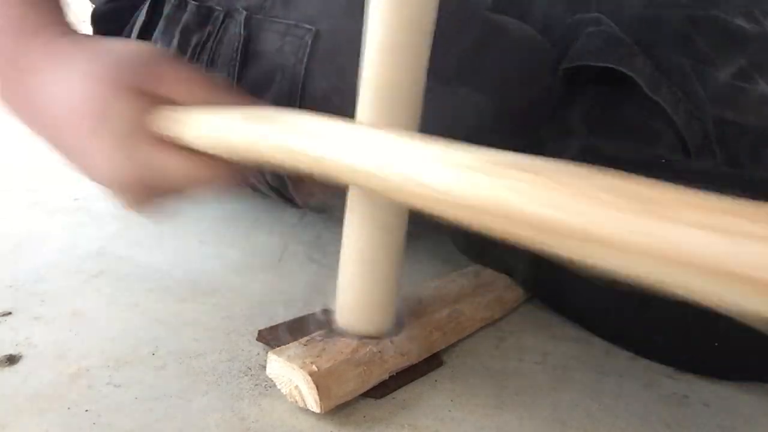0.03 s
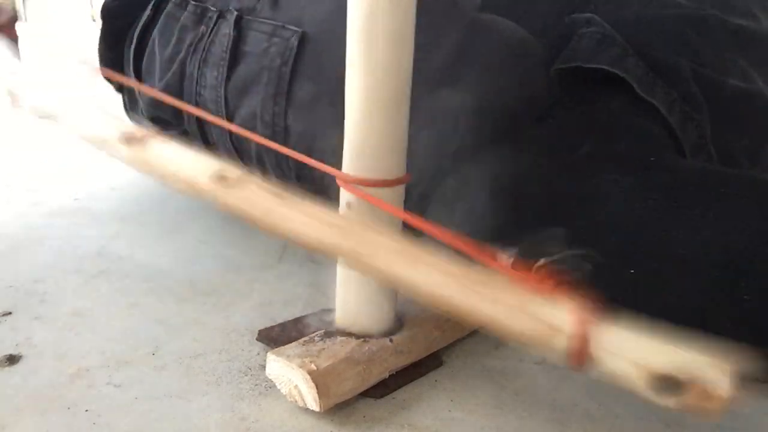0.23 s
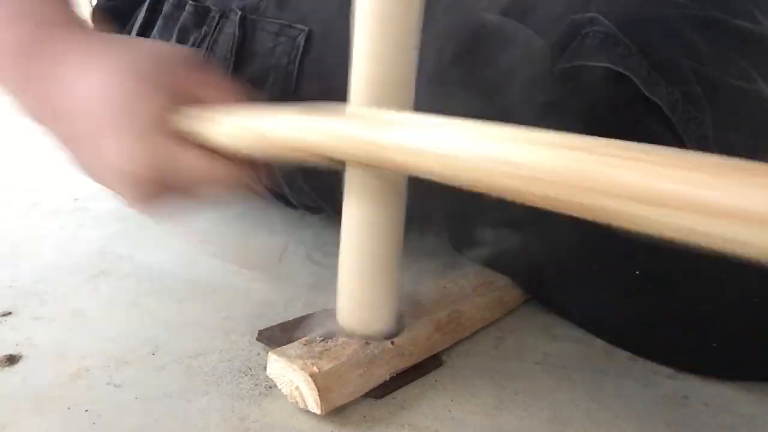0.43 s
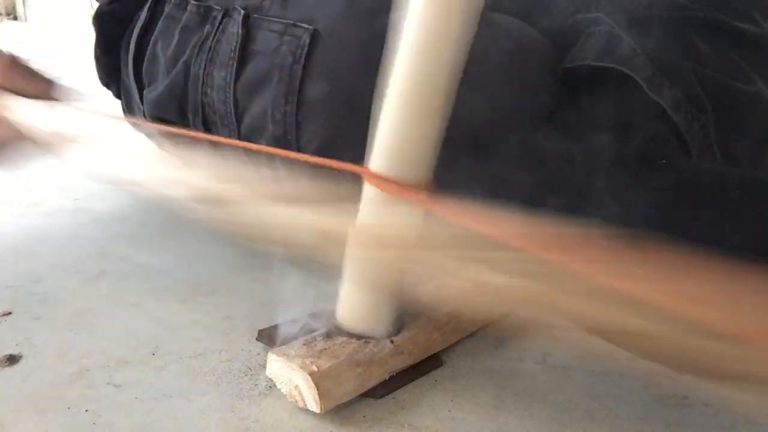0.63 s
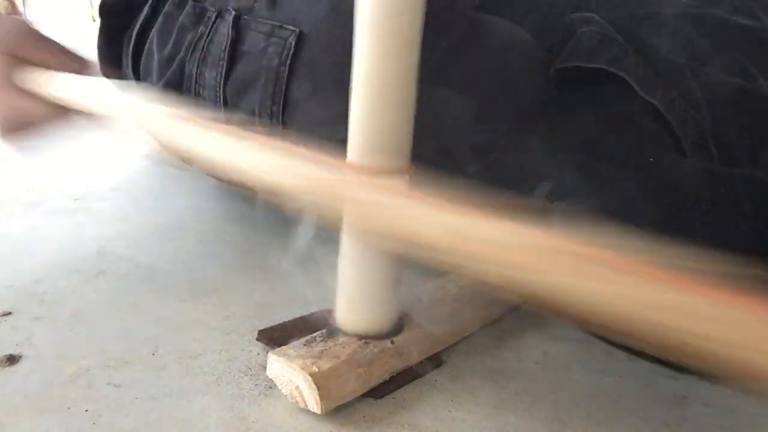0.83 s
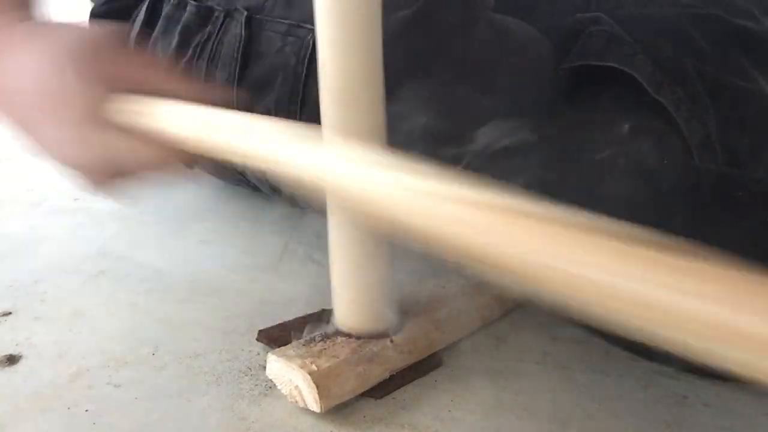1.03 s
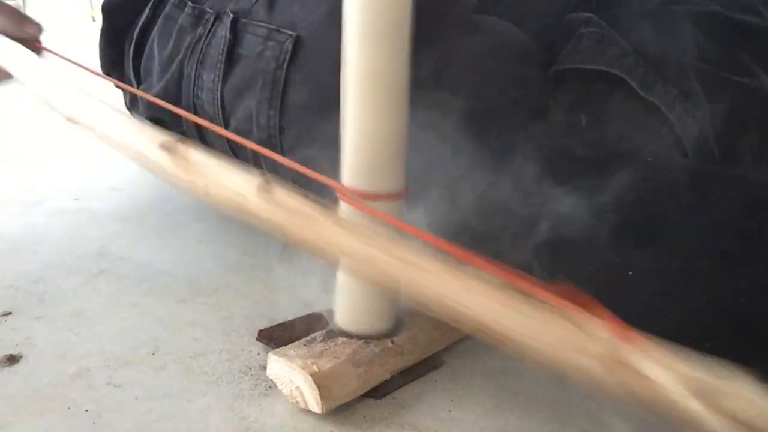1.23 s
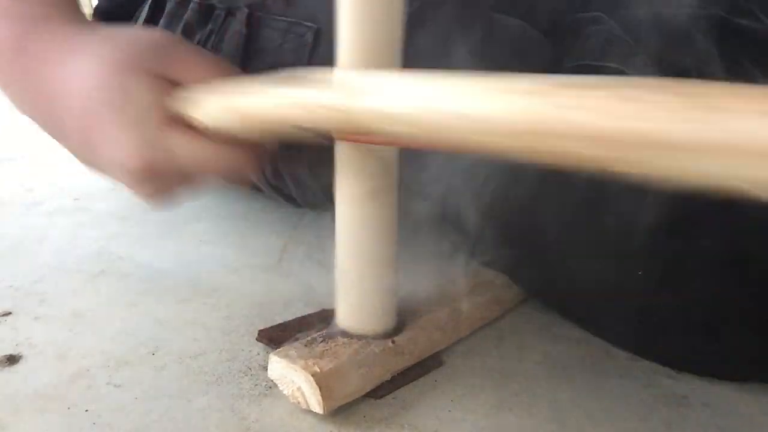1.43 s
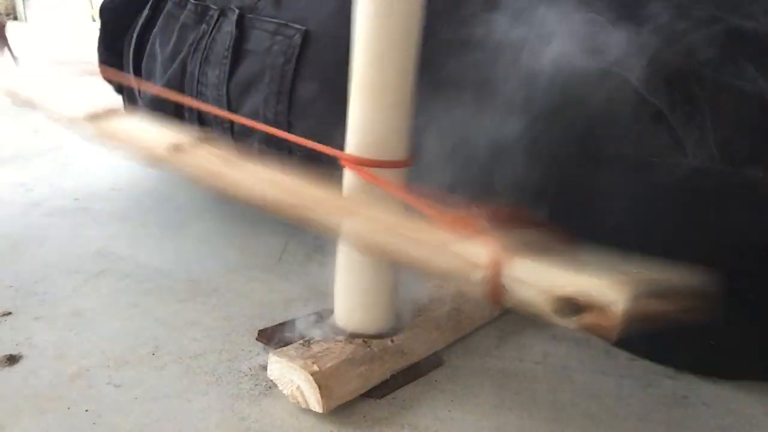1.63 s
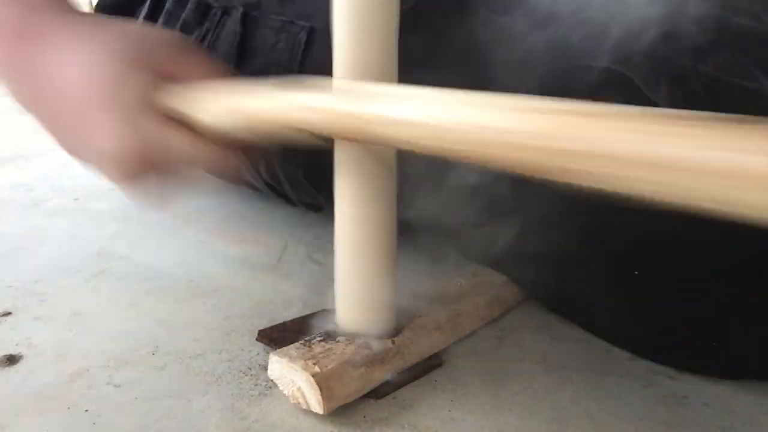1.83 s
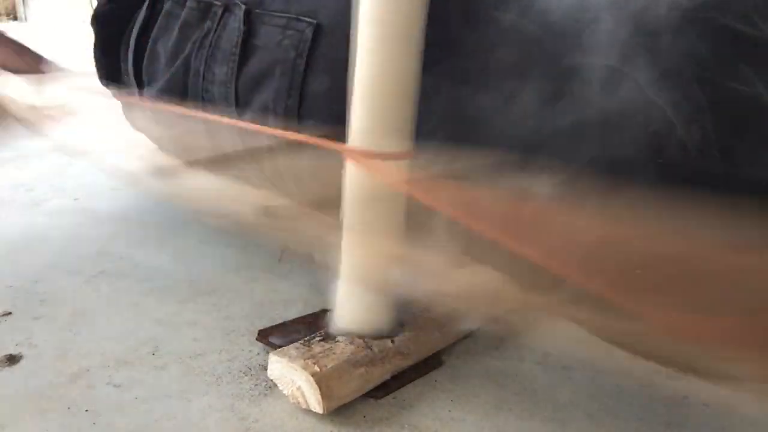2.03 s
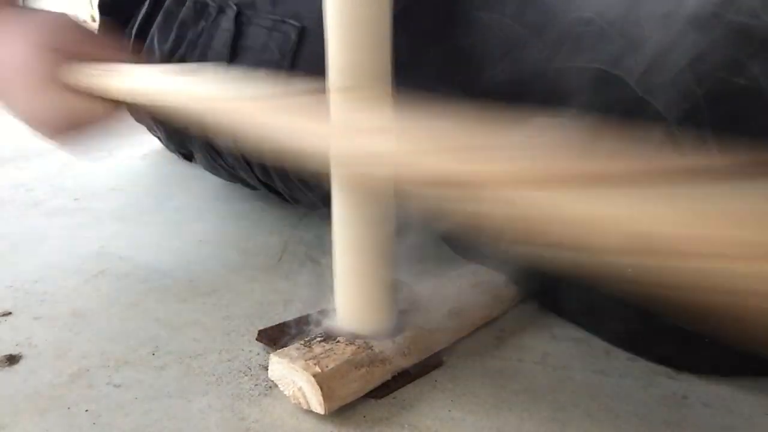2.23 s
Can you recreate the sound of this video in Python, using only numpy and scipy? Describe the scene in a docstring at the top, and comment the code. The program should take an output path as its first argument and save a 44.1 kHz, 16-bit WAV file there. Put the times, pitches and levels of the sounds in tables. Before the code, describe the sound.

Bow drill rasping back and forth in wood, about four strokes a second, with brief sharp squeaks

```python
"""Bow drill up close

One microphone close to the work: a cord spins a wooden spindle to and fro in the socket of a fire board.
Each stroke is filtered noise and grit, rasping through the wood's resonances. At times it breaks into a
low or a high squeak, made of bursts of wavering partials. At the turning points the tip sticks and slips
as gliding tones, creaks as runs of tiny scratches and knocks as damped board modes. Quiet air, steady
noise, lies behind."""
import sys
import numpy as np
from scipy import signal
from scipy.fft import rfft, irfft, next_fast_len
from scipy.io import wavfile
from scipy.ndimage import uniform_filter1d, map_coordinates

SR = 44100
rng = np.random.default_rng(int(sys.argv[2]) if len(sys.argv) > 2 else 0)


def wav_out(sig):
    """Save sig, one row per channel (or a flat mono array), as 16-bit PCM at SR to the path in sys.argv[1]."""
    wavfile.write(sys.argv[1], SR, np.round(np.clip(np.atleast_2d(sig).T, -1, 1) * 32767).astype(np.int16))


def to_linear_factor(level_db):
    """Convert decibel levels (scalar or array-like) to linear amplitude factors."""
    exponent = np.asarray(level_db, float) / 20
    return 10 ** exponent


N = 101429
T = np.arange(N) / SR  # seconds

# Colour of the rasp ahead of the wood. Each row: frequency in Hz, relative level in dB per Hz.
RASP_COLOUR = [(88, -66.5), (150, -8), (1160, -15.5), (1820, -8), (15800, -7.5)]
# Resonances of spindle and board. Each row: centre in Hz, width in Hz, level in dB against the direct path.
WOOD_RESONANCES = [(268, 154, 7), (1320, 300, 20.5), (2580, 393, 14.5), (4114, 990, 9), (7680, 1160, 10.5),
                   (9200, 710, 10), (11400, 1260, 5.5)]
# Bow strokes. Each row: start in seconds, end in seconds, level in dB, time constant of gathering speed
# in seconds, time constant of slowing in seconds.
STROKES = [(-.1, 0.125, -49, 0.0099, 0.043), (0.143, 0.369, -50, 0.028, 0.033),
           (0.394, 0.615, -49.5, 0.03, 0.045), (0.601, 0.842, -46.5, 0.083, 0.021),
           (0.866, 1.105, -50.5, 0.026, 0.014), (1.098, 1.324, -54, 0.031, 0.023),
           (1.324, 1.528, -45, 0.064, 0.016), (1.507, 1.776, -52, 0.018, 0.016),
           (1.769, 2.012, -50.5, 0.044, 0.0028), (2.01, 2.243, -51.5, 0.035, 0.014),
           (2.244, 2.446, -50.5, 0.018, 0.024)]
# Narrow band rasped by singing strokes: centre in Hz, width in Hz, level in dB against the stroke.
SINGING_BAND = (4383, 460, -9)
# Colour of the air. Each row: frequency in Hz, relative level in dB per Hz.
AIR_COLOUR = [(22, -23), (70, -4), (250, -12.5), (700, -14), (3200, -17.5), (15800, -32)]
# Taps on the board. Each row: start in seconds, nominal peak in dB, how freely the board rings
# (a factor on the decay times of BOARD_MODES).
KNOCKS = [(.0042, -27, .2), (.3905, -34, .35), (.624, -33, .8), (1.0848, -35, .4), (1.0995, -39, .7),
          (1.1083, -30, .6), (1.3378, -31, .5), (1.7962, -30, .5), (2.0188, -30, .9), (2.2505, -30, .35)]
# Modes of the tapped board. Each row: frequency in Hz, level in dB, time to fall by 60 dB in seconds.
BOARD_MODES = [(1600, -7, .025), (2000, 0, .03)]
# Soft low bumps of the board. Each row: centre in seconds, level in dB.
BUMPS = [(0.771, -62), (1.267, -61)]
# Low squeak. Each row: centre in seconds, half length in seconds, pitch in Hz, level in dB, octave level in dB.
LOW_SQUEAKS = [(0.208, 0.037, 1262, -51.5, -63), (.245, 0.0041, 1258, -29.5, -70),
               (.257, 0.005, 1201, -22, -31.5), (.272, 0.0099, 1127, -30, -42.5),
               (0.285, 0.0022, 1140, -26.5, -26), (0.295, 0.0086, 1186, -34, -41.5),
               (.331, 0.0041, 1224, -33.5, -44.5), (0.359, 0.04, 1158, -55.5, -65),
               (1.042, 0.0044, 1371, -43, -58.5), (1.289, 0.011, 1315, -54.5, -72),
               (1.46, 0.0058, 1309, -47.5, -70), (1.653, 0.0067, 1115, -37, -53),
               (1.668, 0.0042, 1070, -22, -27), (1.68, 0.0033, 1131, -27, -31),
               (1.687, 0.0038, 1027, -22, -41), (1.699, 0.0049, 1133, -21.5, -30),
               (1.72, 0.0055, 1195, -22.5, -28), (1.73, 0.0038, 1098, -23.5, -29.5),
               (1.737, 0.0037, 1158, -24.5, -32.5), (1.749, 0.0051, 1164, -21.5, -54),
               (1.763, 0.0068, 1245, -41.5, -52), (1.785, 0.0018, 1176, -42.5, -56),
               (1.822, 0.032, 1150, -52.5, -61.5), (2.111, 0.017, 1282, -53, -83),
               (2.138, 0.0063, 1147, -41.5, -57), (2.151, 0.0049, 1260, -33, -54.5),
               (2.169, 0.0047, 1307, -33.5, -48.5)]
# High squeak. Each row: centre in seconds, half length in seconds, pitch in Hz, level in dB.
HIGH_SQUEAKS = [(.035, 0.027, 2560, -53.5), (.06, 0.0022, 2640, -48), (.104, 0.0034, 2520, -53.5),
                (.46, 0.0057, 2540, -31), (.499, 0.0052, 2590, -31.5), (.508, 0.0065, 2634, -31.5),
                (.535, 0.005, 2570, -16.5), (.544, 0.0049, 2631, -23.5), (.57, 0.018, 2560, -42.5),
                (.586, 0.0049, 2494, -30), (.61, 0.0052, 2590, -47), (.632, 0.0094, 2575, -45),
                (.934, 0.0067, 2520, -41.5), (.946, 0.0043, 2580, -43), (1.008, 0.013, 2544, -51),
                (1.41, 0.036, 2477, -57), (2.29, 0.0047, 2550, -49)]
# Brief flares of the upper partials. Each row: centre in seconds, half length in seconds, level in dB.
FLARES = [(.256, 0.006, -55), (.284, .004, -53), (.541, .006, -42.5), (.586, 0.0024, -48),
          (1.741, 0.0087, -55)]
# Stick-slip glides, one list per glide. Each row: time in seconds, slips per second, level in dB.
SLIP_GLIDES = [
    [(.144, 3000, -68), (.15, 4100, -50), (.153, 4500, -60)],
    [(1.509, 6000, -57), (1.522, 4200, -51), (1.527, 3100, -58), (1.539, 2500, -54)],
    [(1.553, 1800, -60), (1.558, 3400, -56), (1.565, 3450, -45), (1.574, 4150, -40), (1.576, 5500, -49),
     (1.583, 6050, -45), (1.59, 6900, -43)],
    [(1.763, 5400, -57), (1.776, 4000, -59)],
    [(1.976, 7700, -55), (1.983, 5300, -59), (1.988, 4400, -47), (2.002, 1700, -56)],
    [(2.022, 2100, -53), (2.037, 4800, -53), (2.044, 6000, -58), (2.053, 6350, -41), (2.059, 8500, -43),
     (2.064, 8700, -58)],
]
# Creaks. Each row: start in seconds, length in seconds, mean slips per second, median slip level in dB.
CREAKS = [(1.084, .01, 1500, -52), (1.329, .01, 2350, -49), (1.543, .013, 1400, -43),
          (1.789, .008, 2000, -45), (1.999, .007, 2300, -46), (2.014, .022, 2300, -50),
          (2.231, .02, 1700, -48)]

# Rasp: the hiss needs more speed than the body (exponents of speed); body corner in Hz
DULL_HZ, BODY_GROWS, HISS_GROWS = 3300, 1.75, 2.02
GRIT_PER_S, GRIT_SPREAD_DB, GRIT_SHARE = 4500, 2.3, .4  # share of power
PATCHY_DB, FLUTTER_DB = 2.8, 1.8
SING_DB = -31  # a stroke sings if a low squeak within it is louder than this
AIR_DB = -66.5
BUMP_HZ, BUMP_S = 304, 0.023
THIRD_DB = -3.5  # third partial of the high squeak against its second
SQUEAK_WAVER = .009  # pitch scatter as a share, before weak moments widen it
WEAK, WEAK_ROUGH_DB = .005, 4  # amplitude around which a squeak turns unsteady, and its added flutter
UPPER_ROUGH_DB = 2.4  # added flutter per overtone, up to the second
SLIP_FALL_DB = -16  # per overtone, before the wood
SLIP_ROUGH_DB, SLIP_WAVER = 4, .025
CREAK_JITTER, SLIP_S = .15, 0.0012  # scatter in mean slip gaps, decay time of one scratch


def unit(x):
    """Brings a signal to rms 1."""
    return x / np.sqrt(np.mean(x ** 2) + 1e-20)


def along(points, hz):
    """Reads (Hz, value) points on a log frequency axis."""
    f, v = np.transpose(points)
    return np.interp(np.log(hz + 1), np.log(f + 1), v, right=-120)


def wobble(per_s):
    """A smooth curve through per_s random values a second."""
    return map_coordinates(rng.standard_normal(N), [T * per_s])


def filtered(x, response):
    """Filters x by a complex response of frequency."""
    m = next_fast_len(N + 8192)
    return irfft(rfft(x, m) * response(np.fft.rfftfreq(m, 1 / SR)), m)[:N]


def resonance(f, centre, width):
    """Band-pass response of one damped resonance, 1 at its centre."""
    return 1j * f * width / (centre * centre - f * f + 1j * f * width)


def wood(f):
    """Direct path plus the resonances of spindle and board."""
    return 1 + sum(to_linear_factor(db) * resonance(f, centre, width) for centre, width, db in WOOD_RESONANCES)


def tone(hz, sizes, waver, rough_db):
    """Partials of the given rms sizes on one wavering pitch, each fluttering on its own."""
    hz = hz * (1 + waver * wobble(250))
    phase = 2 * np.pi * np.cumsum(hz) / SR
    out = 0
    for k, size in enumerate(sizes):
        flutter = to_linear_factor((rough_db + UPPER_ROUGH_DB * min(k, 2)) * wobble(300 + 150 * k))
        audible = (k + 1) * hz < 16500
        out = out + size * flutter * np.sin((k + 1) * phase - k) * audible
    return np.sqrt(2) * out


def fibres():
    """Hiss and grit of charring fibres, patchy in time and pitch, coloured by the wood."""
    struck = rng.random(N) < GRIT_PER_S / SR
    grit = struck * to_linear_factor(GRIT_SPREAD_DB * rng.exponential(size=N)) * rng.choice([-1, 1], N)
    hiss = rng.standard_normal(N)
    mix = np.sqrt(GRIT_SHARE) * unit(grit) + np.sqrt(1 - GRIT_SHARE) * hiss
    z = signal.stft(mix, nperseg=256)[2]
    patches = uniform_filter1d(rng.standard_normal(z.shape), size=3, axis=0)
    patches = uniform_filter1d(patches, size=6, axis=1)
    x = signal.istft(z * to_linear_factor(PATCHY_DB * unit(patches)), nperseg=256)[1][:N]
    return unit(filtered(x, lambda f: to_linear_factor(along(RASP_COLOUR, f)) * wood(f)))


def rasp():
    """Friction of the fibres: level and brightness follow the speed of the tip in each stroke."""
    x = fibres()
    body = filtered(x, lambda f: 1 / (1 + (f / DULL_HZ) ** 2))
    treble = x - body
    centre, width, band_db = SINGING_BAND
    band = to_linear_factor(band_db) * unit(filtered(x, lambda f: resonance(f, centre, width) ** 2))
    out = 0
    for start, end, db, gather, slow in STROKES:
        sings = any(start < row[0] < end and row[3] > SING_DB for row in LOW_SQUEAKS)
        rise = 1 - np.exp(-np.maximum(T - start, 0) / gather)
        fall = 1 - np.exp(-np.maximum(end - T, 0) / slow)
        speed = rise * fall
        out = out + to_linear_factor(db) * ((body + sings * band) * speed ** BODY_GROWS + treble * speed ** HISS_GROWS)
    return out * to_linear_factor(FLUTTER_DB * (wobble(40.2) + wobble(180)))


def air():
    """Steady coloured noise behind the drill."""
    return to_linear_factor(AIR_DB) * unit(filtered(rng.standard_normal(N), lambda f: to_linear_factor(along(AIR_COLOUR, f))))


def knocks():
    """The spindle tips in its socket and taps the board's damped modes; the board bumps softly on the ground."""
    out = np.zeros(N)
    for start, db, free in KNOCKS:
        t = np.maximum(T - start, 0)
        ring = 0
        for hz, mode_db, t60 in BOARD_MODES:
            decay = to_linear_factor(mode_db + 2 * rng.standard_normal() - 60 * t / (free * t60))
            ring = ring + decay * np.sin(2 * np.pi * hz * rng.normal(1, 0.076) * t)
        out += to_linear_factor(db) * (1 - np.exp(-t / 0.00042)) * ring  # the tap sets in softly
    thud = unit(filtered(rng.standard_normal(N), lambda f: np.exp(-np.log((f + 1) / BUMP_HZ) ** 2 * 10)))
    return out + thud * sum(to_linear_factor(db) * np.exp(-((T - s) / BUMP_S) ** 2) for s, db in BUMPS)


def bursts(rows):
    """Pitch through the burst centres, bell-shaped swells per level column, waver and flutter of weak moments."""
    s, half, hz, *levels = np.transpose(rows)
    bell = np.exp(-.5 * ((T[:, None] - s) / half) ** 2)
    sizes = [bell @ to_linear_factor(db) for db in levels]
    weak = 1 / (1 + (sizes[0] / WEAK) ** 2)
    return np.interp(T, s, hz), sizes, SQUEAK_WAVER * (1 + 2 * weak), 0.17 + WEAK_ROUGH_DB * weak


def squeaks():
    """The spindle locks onto one of two resonances and sings; upper partials of the louder one flare at times."""
    low_hz, (low, octave), low_waver, low_rough_db = bursts(LOW_SQUEAKS)
    high_hz, (high,), high_waver, high_rough_db = bursts(HIGH_SQUEAKS)
    flare = sum(to_linear_factor(db - 3.4 * ((T - s) / half) ** 2) for s, half, db in FLARES)
    low_flare, high_flare = flare * (low > high), flare * (high > low)
    low_tone = tone(low_hz, [low, octave, low_flare], low_waver, low_rough_db)
    high_sizes = [high, high_flare, high_flare * to_linear_factor(THIRD_DB)]
    return low_tone + tone(high_hz, high_sizes, high_waver / 2, high_rough_db)


def gate(start, length):
    """1 inside the span, with 1 ms edges."""
    return np.clip(np.minimum(T - start, start + length - T) * 1000, 0, 1)


def slips():
    """Stick-slip glides down as the tip slows, up as it gathers speed; overtones flare on the wood's resonances."""
    out = 0
    for s, per_s, db in map(np.transpose, SLIP_GLIDES):
        hz = np.interp(T, s, per_s)
        size = gate(s[0], s[-1] - s[0]) * to_linear_factor(np.interp(T, s, db))
        overtones = [size * to_linear_factor(SLIP_FALL_DB * k) * np.abs(wood((k + 1) * hz)) for k in range(1, 5)]
        out = out + tone(hz, [size] + overtones, SLIP_WAVER, SLIP_ROUGH_DB)
    return out


def creaks():
    """Short runs of uneven slips at the slowest moment, each a tiny scratch through the wood."""
    pulses, t = np.zeros(N), np.arange(128) / SR
    for start, length, per_s, db in CREAKS:
        draw, run = rng.standard_normal((80, 2)), np.zeros(N)
        when = (np.arange(len(draw)) + CREAK_JITTER * draw[:, 0]) / per_s
        on = (when > 0) & (when < length)
        np.add.at(run, ((start + when[on]) * SR).astype(int), to_linear_factor(db + 2 * draw[on, 1]))
        scratch = rng.standard_normal(len(t)) * np.exp(-t / SLIP_S)
        pulses += signal.fftconvolve(run, scratch / np.linalg.norm(scratch))[:N]
    # the wood, with the lows below 1200 Hz thinned out
    return filtered(pulses, lambda f: wood(f) * (1j * f / (1200 + 1j * f)) ** 2 * 2)


def scene():
    """All sources summed at one microphone."""
    return (rasp() + air() + knocks() + squeaks() + slips() + creaks())[None]


def low_pass(x):
    """Removes everything above the highest recorded frequency."""
    return signal.sosfilt(signal.butter(12, 16950, fs=SR, output="sos"), x)


def record(dry):
    """Takes the close microphone's mix as it stands."""
    return low_pass(dry)


dry = scene()
out = record(dry)
wav_out(out)
```